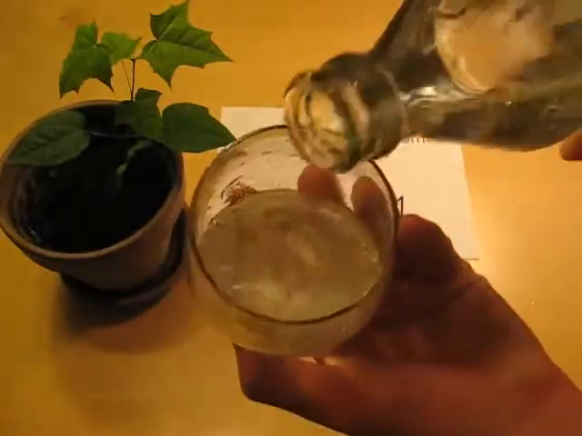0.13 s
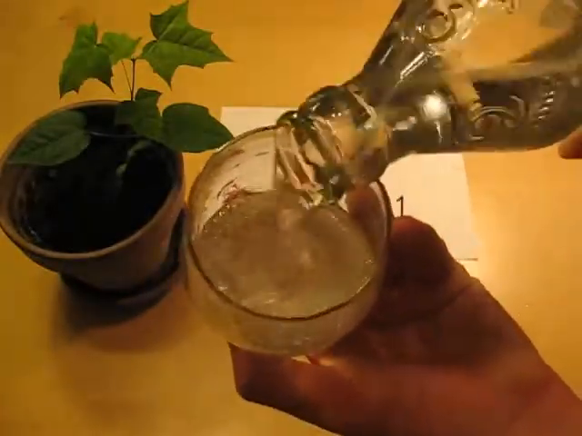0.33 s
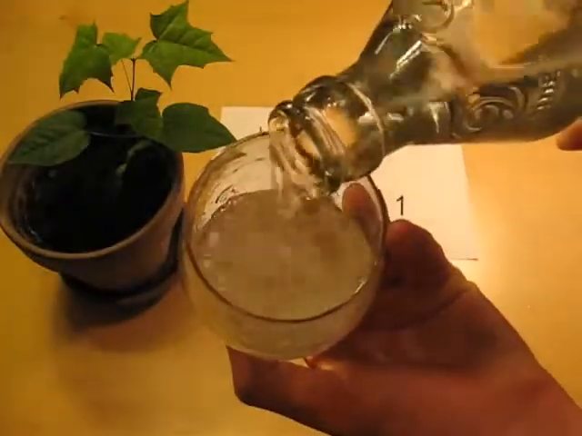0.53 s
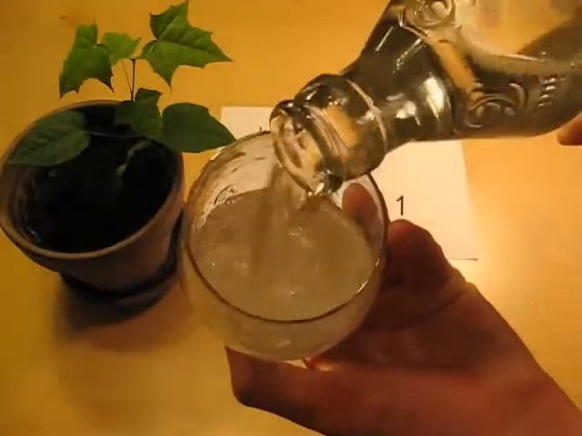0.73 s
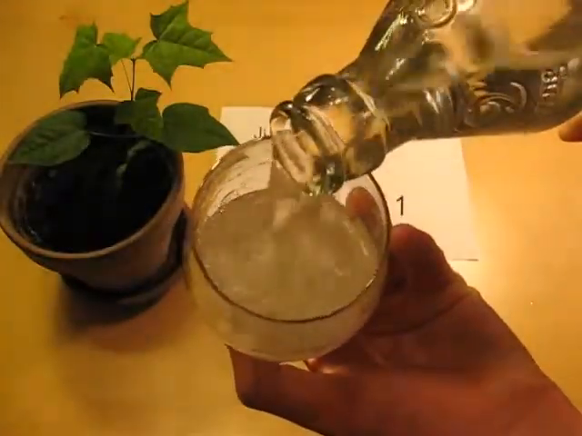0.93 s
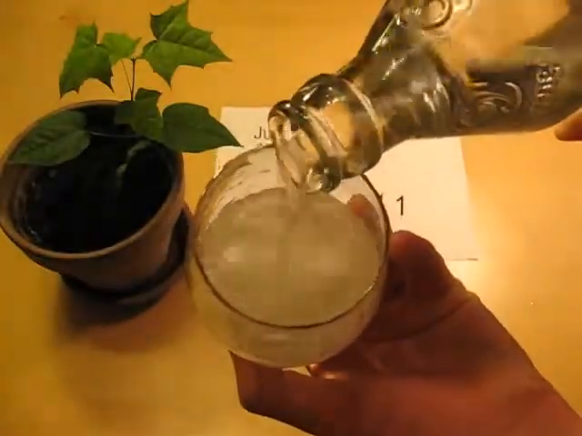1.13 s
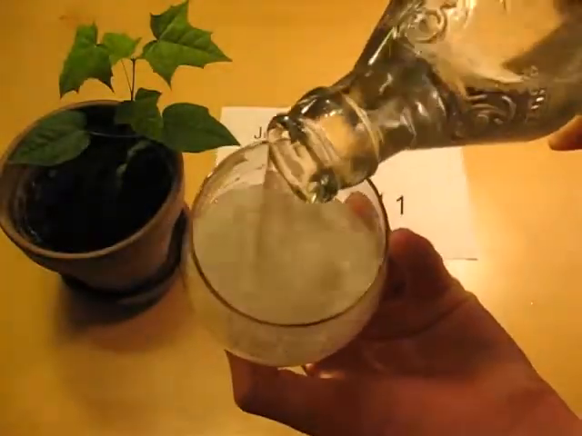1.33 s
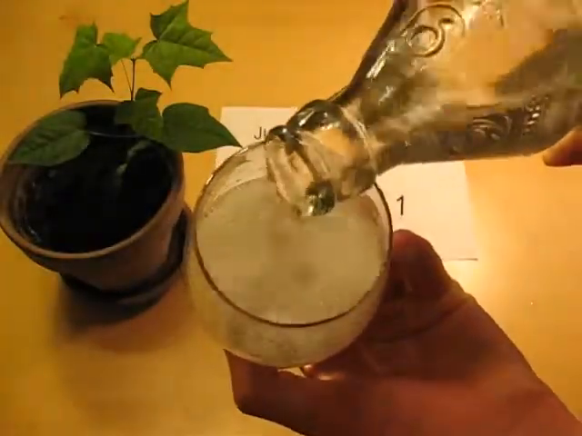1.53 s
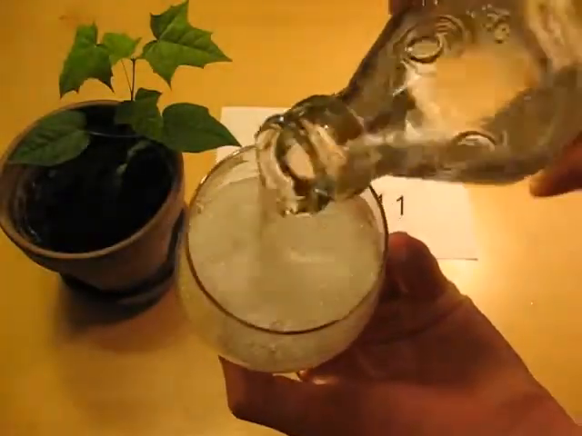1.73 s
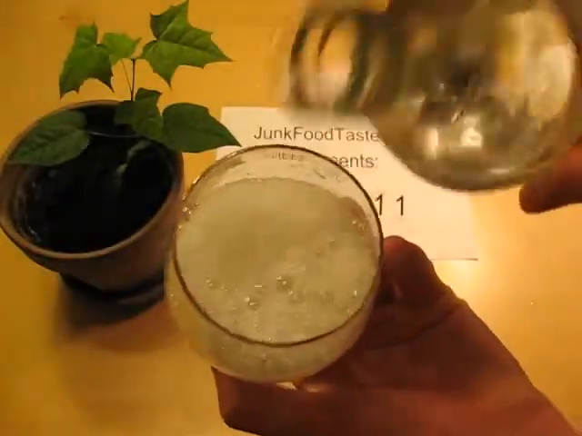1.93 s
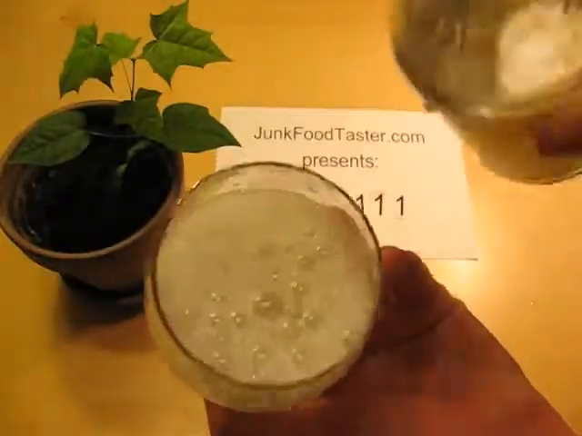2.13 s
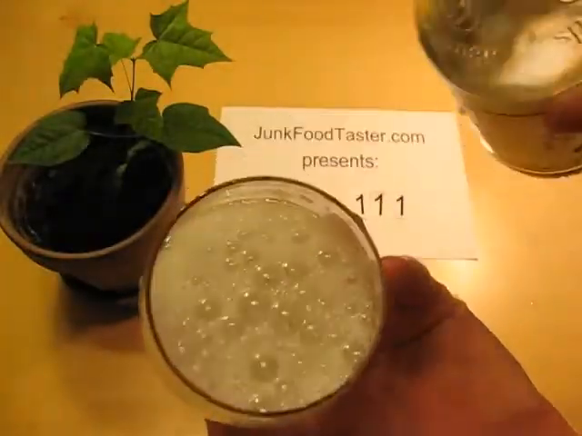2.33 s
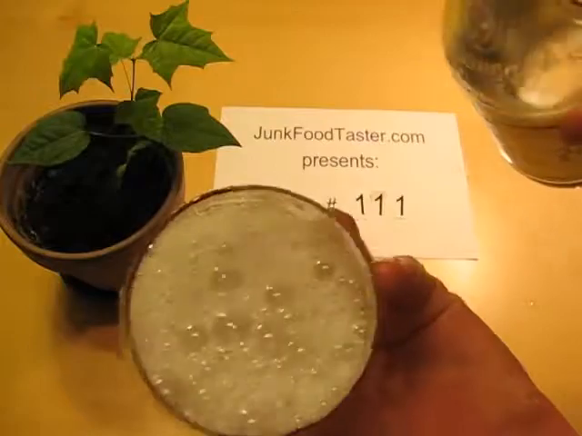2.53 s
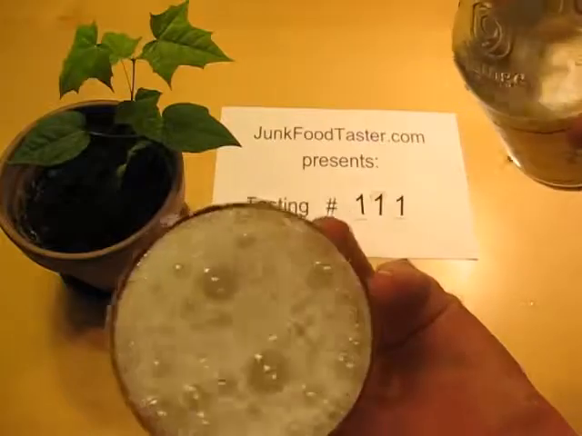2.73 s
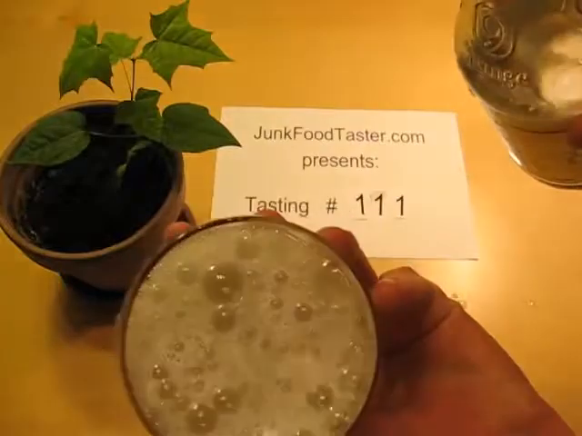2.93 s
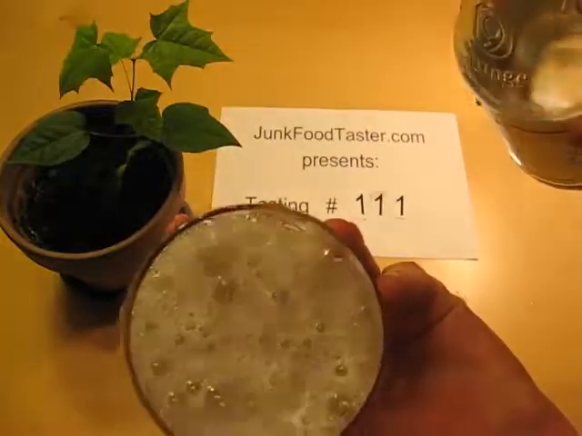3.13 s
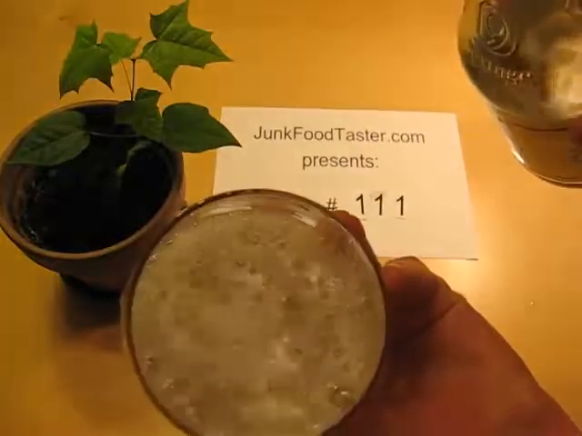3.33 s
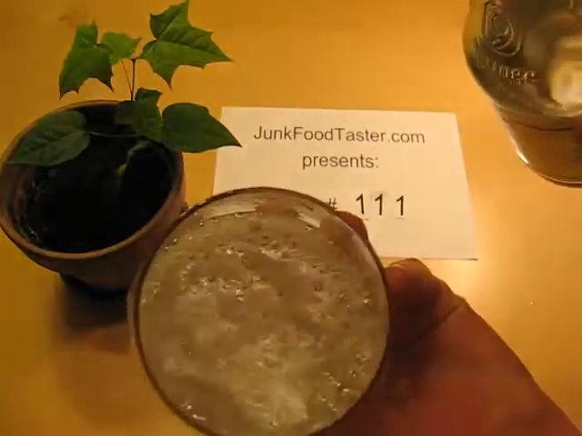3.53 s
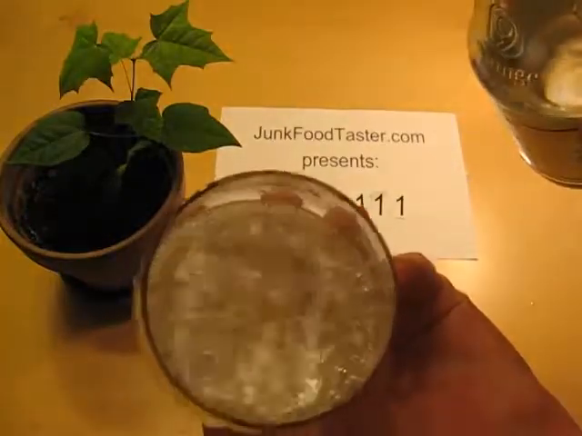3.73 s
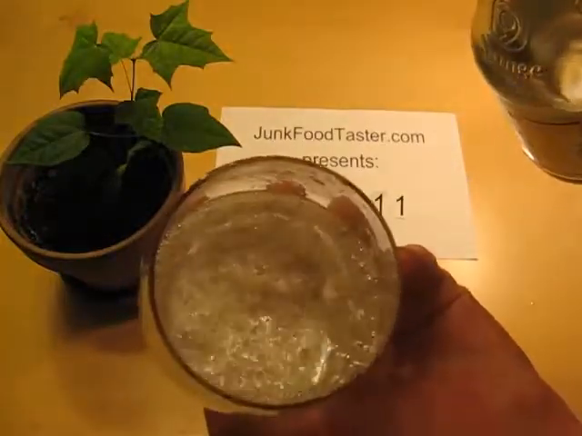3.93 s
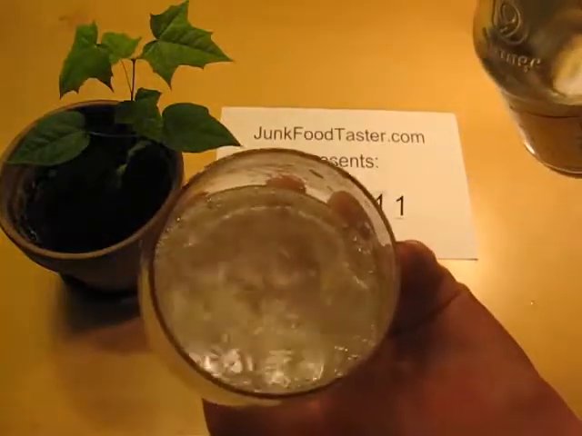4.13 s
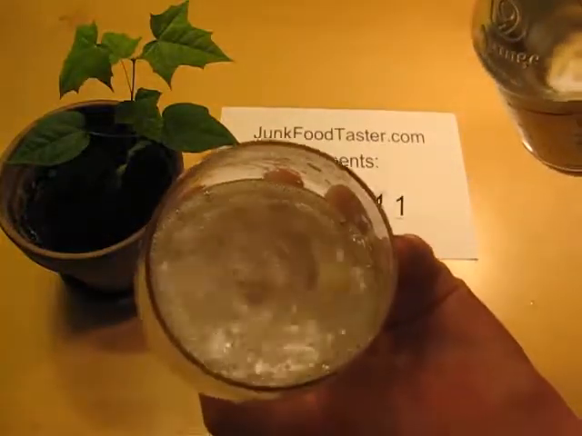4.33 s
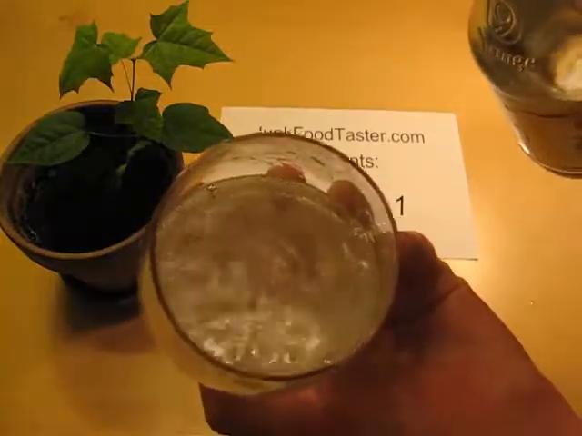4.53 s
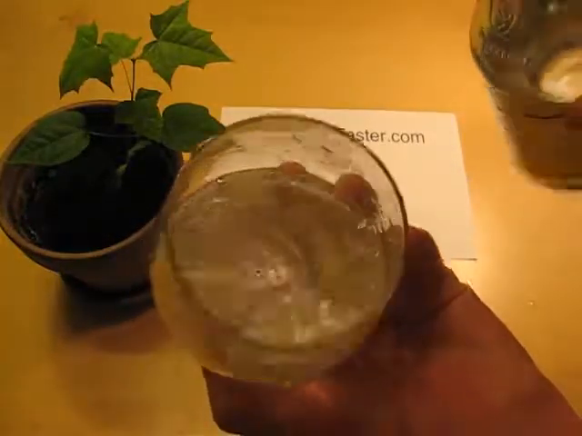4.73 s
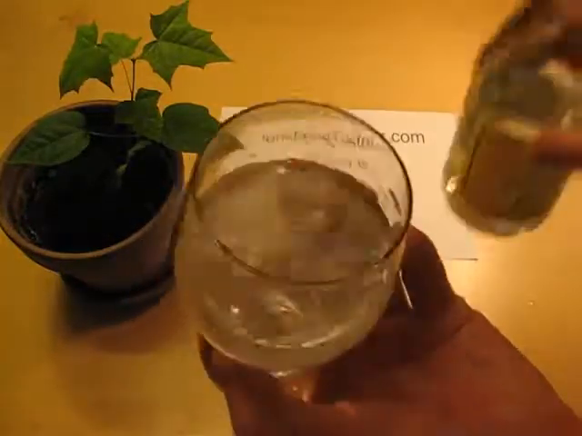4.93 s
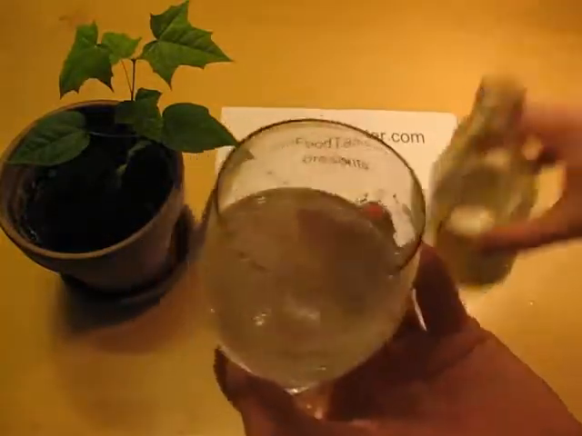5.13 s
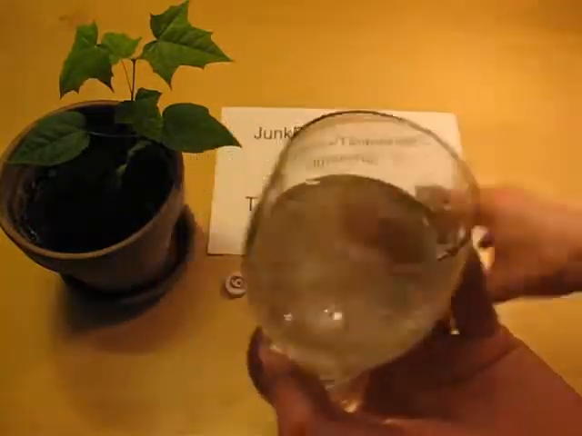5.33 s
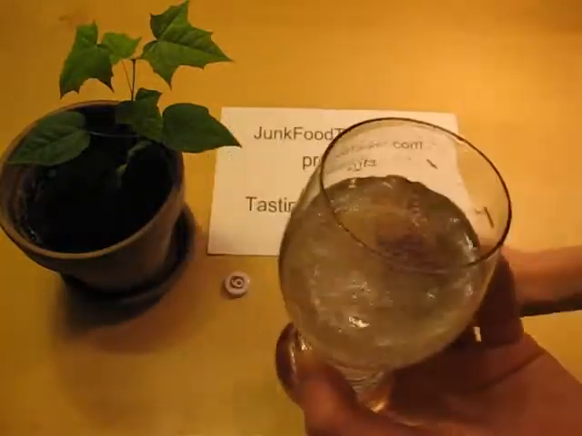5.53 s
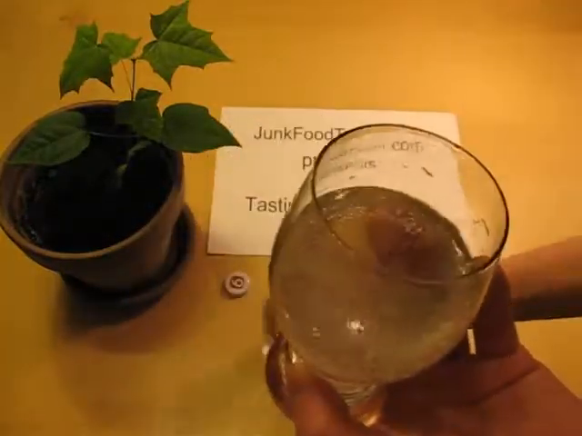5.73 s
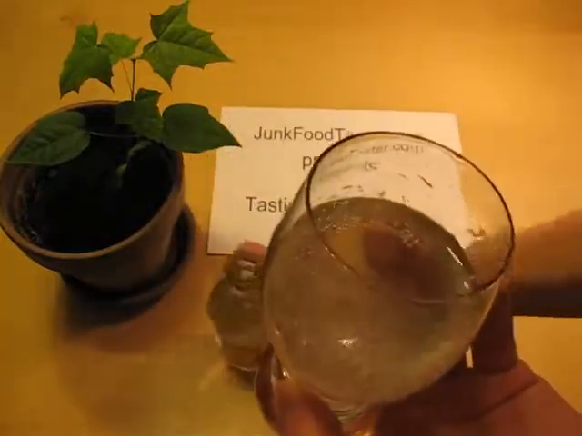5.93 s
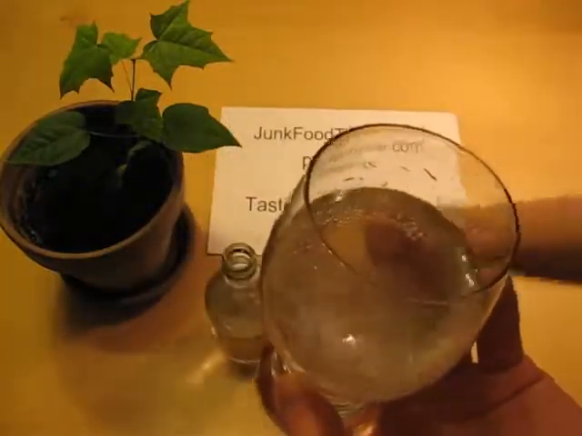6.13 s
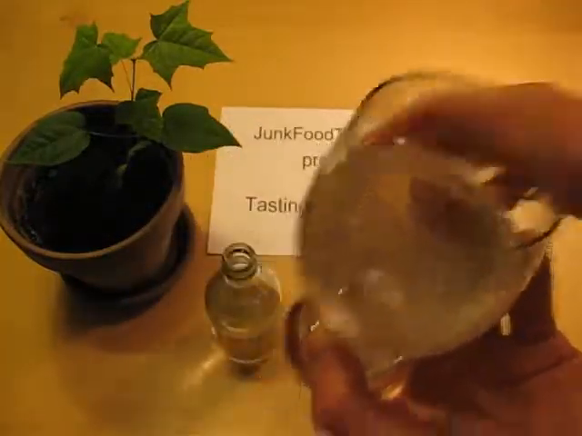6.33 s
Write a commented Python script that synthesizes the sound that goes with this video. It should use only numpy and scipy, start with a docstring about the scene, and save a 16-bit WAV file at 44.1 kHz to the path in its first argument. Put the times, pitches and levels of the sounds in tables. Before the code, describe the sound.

A close, crackling pour of fizzy drink with a glassy clink and plops, foam hissing and fading, ended by a loud wooden thump.

```python
"""Soda is poured from a glass bottle into a hand-held glass, close by in a small room.
A fizz of dense random pops and the bottle's gliding hum come first; struck modes clink as neck meets rim.
During the pour, films snap and ring as spits, gliding tones plop and gulp, and foam widens the fizz to a hiss.
The foam collapses, the drink fizzes on in the open glass, and a sleeve brushes past as soft noise.
Then a small bottle is knocked down on the table: a noise thud, ringing modes and a booming room."""
import sys
import numpy as np
from scipy import signal
from scipy.fft import rfft, irfft, next_fast_len
from scipy.io import wavfile
from scipy.ndimage import uniform_filter1d

SR = 44100
rng = np.random.default_rng(int(sys.argv[2]) if len(sys.argv) > 2 else 0)


def unload_wav(signal):
    """Save mono or channel-first audio to the path in sys.argv[1] as 16-bit WAV at rate SR, clipped to [-1, 1]."""
    wavfile.write(
        sys.argv[1],
        SR,
        np.round(np.clip(np.atleast_2d(signal).T, -1, 1) * 32767).astype(np.int16),
    )


N = 280917
TIME = np.arange(N) / SR
CLINK_S, KNOCK_S = .3058, 5.7824
POUR_START_S, POUR_END_S = 0.41, 1.6


def gain_of(db):
    """Decibels to amplitude."""
    return 10 ** (np.asarray(db) / 20)


def evened(x):
    """Scales to rms 1."""
    return x / np.sqrt(np.mean(x ** 2) + 1e-20)


def read(points, hz):
    """Reads a spectrum on a log-frequency axis."""
    f, value = np.transpose(points)
    return np.interp(np.log(hz + 1), np.log(f + 1), value)


def follow(rows, t):
    """Reads every column of a curve at times t."""
    s, *columns = np.transpose(rows)
    return [np.interp(t, s, c) for c in columns]


def add(mix, s, sound):
    """Mixes a sound in at time s."""
    part = mix[..., round(s * SR):][..., :sound.shape[-1]]
    part += sound[..., :part.shape[-1]]


def swell(t, db, half_s):
    """A smooth bell-shaped rise and fall around t = 0."""
    return gain_of(db) * np.exp(-(t / half_s) ** 2 / 2)


def low_cut(x, hz):
    """Cuts the bass with a steep high-pass."""
    return signal.sosfilt(signal.butter(3, hz, "high", fs=SR, output="sos"), x)


def coloured(x, colour):
    """Gives a signal a spectrum, at rms 1."""
    size = x.shape[-1]
    hz = np.fft.rfftfreq(2 * size, 1 / SR)
    return evened(irfft(rfft(x, 2 * size) * gain_of(read(colour, hz)))[..., :size])


def ring(modes, size=SR):
    """Struck modes, each a sine dying away exponentially."""
    t = np.arange(size) / SR
    return sum(gain_of(db) * 1e-3 ** (t / max(t60, .002)) * np.sin(2 * np.pi * hz * t)
               for hz, db, t60 in modes)


def paired(two, likeness):
    """Short-time spectra of two unrelated signals, made alike as at two close ports."""
    hz, t, z = signal.stft(two, SR, nperseg=512)
    same = np.clip(read(likeness, hz), 0, 1)[:, None]
    right = same * z[0] + np.sqrt(1 - same ** 2) * z[1]
    return hz[:, None], t, np.array([z[0], right])


def sound_of(z):
    """Short-time spectra back to sound."""
    return signal.istft(z, SR)[1][:, :N]


# likeness of diffuse sound at the two ports: (frequency [Hz], likeness [0-1])
DIFFUSE_LIKENESS = [(100, 0.92), (300, 0.78), (550, 0.85), (1000, 0.81), (2000, 0.54), (4000, 0.18),
                    (15000, 1)]


def diffuse(size):
    """Noise arriving from all sides, as short-time spectra."""
    return paired(rng.standard_normal((2, size)), DIFFUSE_LIKENESS)


def murk(db, colour):
    """Soft diffuse noise of a given level and colour."""
    return gain_of(db) * coloured(sound_of(diffuse(N)[2]), colour)


# the head of foam grows during the pour, slowly at first, stands, then collapses
FOAM_FULL_S, FOAM_BREAKS_S, FOAM_GONE_S = 1.83, 2.53, 4.27
FOAM_CURVE = 1.5


def foam_share(t):
    """Share of the surface under foam, 0-1."""
    growth = (t / FOAM_FULL_S) ** FOAM_CURVE
    collapse = (FOAM_GONE_S - t) / (FOAM_GONE_S - FOAM_BREAKS_S)
    return np.clip(np.minimum(growth, collapse), 0, 1)


# fizz heard through the foam head: (frequency [Hz], relative density [dB per Hz])
FOAM_SPECTRUM = [(300, -27), (700, -13.5), (1000, -5), (1220, 2.5), (1550, -1.5), (2200, -7), (3000, -3.5),
                 (4500, -1), (7100, 1.5), (8200, -2), (10000, -12.5), (11800, -11), (15500, -25)]
# bands that swell in the foam, a hollow murmur and then a hiss sweeping upward: (time of the middle [s],
# half length [s], lift [dB], centre [Hz], glide [octaves per s], half width [octaves])
FOAM_BANDS = [(2.6, .28, 2.8, 1120, .1, .2), (3.05, .35, 2.2, 4500, 1.2, .3)]
# as the head drains it loses its low murmur
DRAIN_S, DRAIN_DB_PER_S, DRAIN_BELOW_HZ = 2.44, 8, 1100


def foam_colour(hz, t):
    """Spectrum of the foam in dB, as it drains and collapses."""
    lowness = np.clip(2 * np.log2(DRAIN_BELOW_HZ / (hz + 1)), 0, 1)
    drain = DRAIN_DB_PER_S * np.clip(t - DRAIN_S, -.5, 1) * lowness
    bands = 0
    for s, half_s, db, centre, glide, width in FOAM_BANDS:
        octaves_off = np.log2((hz + 1) / centre) - glide * (t - s)
        bands = bands + db * swell(t - s, 0, half_s) * swell(octaves_off, 0, width)
    return read(FOAM_SPECTRUM, hz) - drain + bands


# fizz level before trim: (time [s], level below the split [dB], level above the split [dB])
FIZZ_LEVELS = [(0, -47, -42.5), (.3, -49.5, -45.5), (.85, -47, -45.5), (1.3, -39, -41.7),
               (2.3, -35.5, -38.5), (2.85, -35, -40.5), (3.28, -35.5, -38.5), (3.7, -40, -40.4),
               (4.22, -46, -45.5), (4.62, -46.5, -46), (5.1, -54.5, -49.5), (5.75, -55, -48.5),
               (6.37, -54.5, -51)]
# fizz of the bare surface between the resonances: (frequency [Hz], relative density [dB per Hz])
BARE_SPECTRUM = [(300, -19.5), (1000, -57), (2300, -19.5), (3500, -18), (5000, -9.5), (6500, -7),
                 (8200, -5.5), (10200, -13), (12000, -11), (15500, -27.5)]
# resonances of the air above the drink: (frequency [Hz], width [Hz], relative level [dB])
AIR_RESONANCES = [(1242, 64, -4), (1850, 190, -23), (2912, 152, -1.5), (4440, 580, -6), (5570, 140, -1.5),
                  (7400, 610, 2), (8100, 220, -3.5)]
# likeness of the fizz at the two ports: (frequency [Hz], left-right likeness [0-1])
FIZZ_LIKENESS = [(100, 0.42), (1400, 1), (3100, 0.98), (6800, 0.72), (11000, 0.29), (15000, .2)]
# bursts so many that they almost merge
POPS_PER_S = 11000


def fizz(spread_db=3.0, wash=0.36, coarse_db=-1.0, fine_db=0.5, split_hz=6300, clump_db=1.37):
    """Countless tiny bursts ring the air in the glass; foam damps that ring to a broad hiss."""
    sizes_db = spread_db * np.minimum(rng.exponential(1, (2, N)), 5)
    sizes = gain_of(sizes_db) * rng.choice([-1, 1], (2, N))
    pops = evened(sizes * (rng.random((2, N)) < POPS_PER_S / SR))
    hz, t, z = paired(pops + wash * rng.standard_normal((2, N)), FIZZ_LIKENESS)

    # the bare, resonant colour gives way to the foam's colour and returns
    foam = foam_share(t)
    column = sum(gain_of(db) ** 2 / (1 + (2 * (hz - f) / width) ** 2) ** 1.67
                 for f, width, db in AIR_RESONANCES)
    bare = np.sqrt(column + gain_of(read(BARE_SPECTRUM, hz)) ** 2)
    colour = bare ** (1 - foam) * gain_of(foam_colour(hz, t)) ** foam

    # coarse and fine fizz follow separate levels
    fine = 1 / (1 + (split_hz / (hz + 1)) ** 12)
    field = 0
    for share, level, trim in zip((1 - fine, fine), follow(FIZZ_LEVELS, t), (coarse_db, fine_db)):
        part = colour * share
        field = field + gain_of(level + trim) * part / np.sqrt(np.mean(part ** 2, axis=0))

    # bubbles of like size surface in clumps, most clearly where the foam is gone
    across_pitch = uniform_filter1d(rng.standard_normal(field.shape), size=14, axis=0)
    clumps = evened(uniform_filter1d(across_pitch, size=3, axis=1))
    return sound_of(z * field * gain_of(clump_db * (1 - foam / 2) * clumps))


def glug(s, db, hz, octaves_per_s, half_s, flutter=.35):
    """A pocket of air sounds one soft, fluttering glide: start time and sound."""
    t = np.arange(-3 * half_s, 3 * half_s, 1 / SR)
    wobble = 1 + flutter * evened(uniform_filter1d(rng.standard_normal(SR), size=400))[:len(t)]
    phase = 2 * np.pi * np.cumsum(hz * 2 ** (octaves_per_s * t)) / SR
    return s + t[0], swell(t, db, half_s) * wobble * np.sin(phase)


# air ringing in the bottle: its pitch settles upward, and it fades, losing a step once drink fills the neck
HUM_START_HZ, HUM_END_HZ, HUM_SETTLE_S = 248, 262, .8
HUM_DB, HUM_FADE_DB_PER_S, HUM_OPEN_DB = -59, 3.5, 2
# air gulped through the neck, each gulp a short upward glide: (time of the middle [s], level [dB])
NECK_GULPS = [(.546, -45), (.888, -47.5), (1.192, -47.5), (1.501, -44.5)]
GULP_HZ, GULP_OCTAVES_PER_S, GULP_HALF_S = 113, 34.4, 0.016
# swallowed air then wobbling in the bottle: (time of the middle [s], level [dB], pitch [Hz])
BOTTLE_BLUBS = [(.99, -54, 156), (1.278, -46, 205), (1.571, -40, 238)]
BLUB_OCTAVES_PER_S, BLUB_HALF_S = -2.7, 0.017


def bottle(waver=0.05, waver_hz=7):
    """The bottle's hollow hums, and air slips in through the neck in short gliding gulps."""
    hz = HUM_END_HZ + (HUM_START_HZ - HUM_END_HZ) * np.exp(-TIME / HUM_SETTLE_S)
    neck_db = np.interp(TIME, [CLINK_S, POUR_START_S], [HUM_OPEN_DB, 0])
    level = np.sqrt(2) * gain_of(HUM_DB - HUM_FADE_DB_PER_S * TIME + neck_db)
    # slow noise wavers both strength and phase of the hum
    slow = signal.butter(2, waver_hz, fs=SR, output="sos")
    drift = evened(signal.sosfilt(slow, rng.standard_normal((2, N))))
    wavering = 1 + waver * (drift[0] + 1j * drift[1])
    out = level * (wavering * np.exp(2j * np.pi * np.cumsum(hz) / SR)).real
    for s, db in NECK_GULPS:
        add(out, *glug(s, db, GULP_HZ, GULP_OCTAVES_PER_S, GULP_HALF_S))
    for s, db, pitch in BOTTLE_BLUBS:
        add(out, *glug(s, db, pitch, BLUB_OCTAVES_PER_S, BLUB_HALF_S))
    return out


# colour of a snap: (frequency [Hz], relative density [dB per Hz])
SNAP_SPECTRUM = [(300, -18), (700, -5), (1200, -2), (2100, -8), (3000, -2), (5000, -1), (7500, 1),
                 (8600, -8), (10000, -18), (15500, -32)]


def snap(decay_s):
    """The brief noise crack of a tearing film or a hard contact."""
    t = TIME[:2048]
    return coloured(rng.standard_normal(len(t)), SNAP_SPECTRUM) * np.exp(-t / decay_s)


# glass modes as neck meets rim: (frequency [Hz], level [dB], decay by 60 dB [s])
CLINK_MODES = [(645, -15, 0.051), (627, -43, 0.2), (1010, -14.5, 0.025), (1398, -21.5, 0.08),
               (1404, -33, 0.62), (2640, -36, 0.22), (7526, -19.5, 0.13), (7545, -32, 0.63),
               (8000, -36, 0.08), (9695, -42, 0.11)]


def clink(tick_db=-15, tick_s=0.0052):
    """The neck touches the rim with a tick and the glass rings."""
    out = np.zeros(N)
    add(out, CLINK_S, ring(CLINK_MODES))
    add(out, CLINK_S, gain_of(tick_db) * snap(tick_s))
    return out


# the longest partial of the clink dies slowly, and swells once as the bottle turns
RING_HZ, RING_DB, RING_T60 = 4839, -30, 1.05
SWELL_S, SWELL_DB, SWELL_HALF_S = 0.364, -22.5, 0.026


def singing_rim():
    """The longest partial of the clink sings on, swelling and fading."""
    t = np.maximum(TIME - CLINK_S, 0)
    level = gain_of(RING_DB - 60 * t / RING_T60) + swell(TIME - SWELL_S, SWELL_DB, SWELL_HALF_S)
    return level * np.sin(2 * np.pi * RING_HZ * t)


def burst(hz, t60, snap_db, rise_s=0.0014, snap_s=0.0024, tear_s=0.0028, tear_db=-5, glide=2):
    """A film tears with a snap, and the bubble rings briefly, its pitch rising as it surfaces."""
    t = TIME[:2048]
    tone = 1e-3 ** (t / max(t60, .004)) * np.sin(2 * np.pi * hz * (t + glide * t ** 2 / 2))
    # noise gathered around the bubble's pitch
    tear_colour = [(hz / 3, -30), (hz / 1.17, -12), (hz, 0), (hz * 1.35, -15), (hz * 2, -35)]
    tear = coloured(rng.standard_normal(len(t)), tear_colour) * np.exp(-t / tear_s)
    attack = 1 - np.exp(-(t / rise_s) ** 2)
    return (tone + gain_of(tear_db) * tear + gain_of(snap_db) * snap(snap_s)) * attack


# level difference of the two microphone ports: (frequency [Hz], left minus right [dB])
PORT_BALANCE = [(100, -1), (2400, 0), (4400, -4), (8100, -3), (11000, 7.5), (15000, 13.5)]
# the loudest small bubbles: (time [s], level [dB], pitch [Hz], broad snap relative to the ring [dB])
LOUD_SPITS = [(0.4312, -11, 5140, -2), (0.442, -12, 5180, -17), (0.488, -14, 6980, -13),
              (0.5305, -26, 7400, 2), (0.5467, -13.5, 7500, -1.5), (0.564, -12, 7520, -19),
              (0.5731, -20, 2970, 1), (0.5822, -22.5, 2950, -5), (.6085, -22, 5700, -5),
              (0.647, -18.5, 5680, -13), (0.6861, -25, 3410, -0.5), (.727, -29.5, 5000, 1),
              (0.8714, -13, 7550, -6), (.8992, -11, 7000, -23), (.965, -30, 2890, -3),
              (1.02, -10.5, 7300, -2), (1.0317, -16, 7170, -10), (1.07, -16, 6230, -0.5),
              (1.0822, -19, 3150, -8), (1.1847, -18.5, 6970, -7), (1.268, -27, 5930, 5.5),
              (1.3126, -22, 7450, 5.5), (1.482, -20.5, 7500, 0.5), (1.6375, -18.5, 5940, 2),
              (5.2789, -25, 7600, -8), (5.422, -26, 7640, -12)]
# ring time at this pitch; larger, lower bubbles ring longer
SPIT_T60, SPIT_T60_HZ, SPIT_SIZE_LAW = 0.023, 5950, .55
SPIT_PAN_DB = -3.5  # left minus right, as heard after the ports


def spits(level_db=0.0):
    """The loudest small bubbles burst, a little to the right."""
    out = np.zeros((2, N))
    for s, db, hz, snap_db in LOUD_SPITS:
        # cancels the port balance at the pitch, so that only the pan remains
        lean = (SPIT_PAN_DB - read(PORT_BALANCE, hz)) * np.array([[.5], [-.5]])
        t60 = SPIT_T60 * (SPIT_T60_HZ / hz) ** SPIT_SIZE_LAW
        add(out, s, gain_of(db + level_db + lean) * burst(hz, t60, snap_db))
    return out


# hollow body under a plop: (frequency [Hz], relative level [dB], decay by 60 dB [s])
HOLLOW_MODES = [(304, -4, 0.056), (641, -5, 0.036), (864, 2, 0.0099)]
PLOP_T60, LINGER_T60 = .03, .12


def plop(hz, body_db, linger_db=-20, hollow_db=-1, snap_db=-14, snap_s=0.0034, sag=.06, sag_s=.003):
    """A large bubble opens and sounds the air above the drink, starting a little sharp."""
    t = TIME[:12000]
    fade = 1e-3 ** (t / PLOP_T60) + gain_of(linger_db) * 1e-3 ** (t / LINGER_T60)
    pitch = hz * (1 + sag * np.exp(-t / sag_s))
    tone = fade * np.sin(2 * np.pi * np.cumsum(pitch) / SR)
    out = tone + gain_of(body_db + hollow_db) * ring(HOLLOW_MODES, size=len(t))
    add(out, 0, gain_of(snap_db) * snap(snap_s))
    return out


# large bubbles breaking, levels before trim: (time [s], level [dB], pitch [Hz], hollow body [dB])
LOUD_PLOPS = [(0.4329, -30, 984, -24), (0.4714, -20.5, 990, -22), (.658, -22.5, 880, -20),
              (0.8738, -29.5, 1097, -5.5), (1.0219, -17, 1100, -7.5), (1.186, -32.5, 1100, -10),
              (1.2693, -32, 1215, -8), (1.3179, -21.5, 1050, 3), (1.35, -26, 1130, -16),
              (1.504, -28, 1200, -13), (1.522, -30, 1220, -14), (1.638, -26.5, 1253, 3.5),
              (1.6994, -23.5, 1190, -8.5)]
# lesser plops fall at random during the pour, their pitch rising as the glass fills
SMALL_PLOP_DB, SMALL_PLOP_BODY_DB, EMPTY_HZ, FULL_HZ = -34.5, -6, 920, 1280


def plops(level_db=2, count=10):
    """The loud plops, and lesser ones spread over the pour."""
    out = np.zeros(N)
    for s, db, hz, body_db in LOUD_PLOPS:
        add(out, s, gain_of(db + level_db) * plop(hz, body_db))
    for filled in (np.arange(count) + rng.random(count)) / count:
        s = POUR_START_S + filled * (POUR_END_S - POUR_START_S)
        hz = EMPTY_HZ + filled * (FULL_HZ - EMPTY_HZ)
        add(out, s, gain_of(SMALL_PLOP_DB) * plop(hz, SMALL_PLOP_BODY_DB))
    return out


def scatter(start, end, count, level_db, low_hz, high_hz, snap_db):
    """Stray bubbles burst at random size, pitch, time and place."""
    out = np.zeros((2, N))
    for when, pitch, size, place in rng.random((count, 4)):
        tick = burst(low_hz * (high_hz / low_hz) ** pitch, .018, snap_db)
        pan_db = (place - .5) * np.array([[6], [-6]])
        loudness = gain_of(level_db - 10.5 * np.sqrt(size) + pan_db)
        add(out, start + when * (end - start), loudness * tick)
    return out


def in_glass(x, column_db=-4.5):
    """Each burst also rings the air standing above the drink, here its three lowest resonances."""
    t = TIME[:2048]
    column = 0
    for hz, width, db in AIR_RESONANCES[:3]:
        decay = 2 * np.pi * width / SR * np.exp(-np.pi * width * t)
        column = column + gain_of(db) * decay * np.cos(2 * np.pi * hz * t)
    return x + gain_of(column_db) * signal.oaconvolve(x, column[None], axes=1)[:, :N]


# decay of the room: (frequency [Hz], decay by 60 dB [s])
ROOM_DECAY = [(100, 1), (300, 0.8), (700, 0.58), (2500, 0.7), (6000, 0.42), (14000, 0.43)]


def room_tail():
    """Diffuse reflections that build up, then die at a rate set by frequency."""
    hz, t, z = diffuse(SR)
    tail = sound_of(z * gain_of(-60 * t / read(ROOM_DECAY, hz)))[:, :SR]
    tail *= np.clip((TIME[:SR] - .004) / 0.0049, 0, 1)
    return tail / np.linalg.norm(tail[0])


# hand and sleeve brushing past: (time of the middle [s], level [dB], half length [s])
SLEEVE_BRUSHES = [(4.4, -56, .07), (4.743, -55, 0.17), (5.75, -52, 0.33), (6.37, -55.5, 0.19)]
# colour of the brushing: (frequency [Hz], relative density [dB per Hz])
BRUSH_SPECTRUM = [(30, -45), (150, -11), (400, -3), (800, -21), (1200, 1.5), (1500, -5.5), (1800, -1.5),
                  (2400, -12.5), (4000, -8), (9000, -46)]


def rustle():
    """Each move of the arm is a soft swell of brushing noise."""
    level = sum(swell(TIME - s, db, half_s) for s, db, half_s in SLEEVE_BRUSHES)
    return level * murk(0, BRUSH_SPECTRUM)


# modes of the table top: (frequency [Hz], level [dB], decay by 60 dB [s])
TABLE_MODES = [(117, -47, 2.4), (128, -33, 1.0), (193, -24, .55), (264, -22, .6), (301, -38, 2.8),
               (340, 1.5, .075), (354, -34.5, 2.2), (404, -44, 1.8), (457, -24, .6), (497, -23.5, .7),
               (564, -25, .4), (625, -26, .5), (708, -14, .27), (763, -25, .5), (938, -18, .25),
               (1631, -24, .12), (2643, -30, .14)]
# colour of the thud: (frequency [Hz], relative density [dB per Hz])
THUD_SPECTRUM = [(18, -52), (30, -20), (87, -39), (240, -4), (404, -6.5), (581, -3), (978, -2.5),
                 (1200, -15.5), (2560, -15), (3500, -20), (3980, -21), (5300, -23), (15000, -52)]
# colour of the room after the blow: (frequency [Hz], relative density [dB per Hz])
BOOM_SPECTRUM = [(29, -77), (50, -35), (119, -30), (153, -10), (180, -8), (231, -18), (256, -5.5),
                 (438, -0.5), (598, -9.5), (705, -4.5), (815, -9), (1680, -16.5), (7000, -35), (9100, -74),
                 (15400, -120)]


def knock(thud_db=-3.5, thud_s=0.0071, boom_db=-26.5, low_hz=115, shake_db=-40, shake_s=.004):
    """A hard blow on the table top: a thud, the table's modes, and the room booming after."""
    out, t = np.zeros((2, N)), TIME[:SR]
    noise = coloured(sound_of(diffuse(SR)[2])[:, :SR], THUD_SPECTRUM)
    thud = gain_of(thud_db) * noise * np.exp(-t / thud_s)
    # the thud and the table's modes keep little bass, but one low push shakes the microphones directly
    shake = gain_of(shake_db) * (1 - t / shake_s) * np.exp(-t / shake_s)
    boom = gain_of(boom_db) * coloured(room_tail(), BOOM_SPECTRUM)
    add(out, KNOCK_S, low_cut(thud + ring(TABLE_MODES), low_hz) + shake + boom)
    return out


# phase difference of the two ports: (frequency [Hz], left minus right [radians])
PORT_PHASES = [(100, -0.07), (3200, 0.015), (5400, 1.07), (7150, 0.28), (9400, 1.3), (11000, 1.2),
               (15000, -0.14)]


def ports(x):
    """The two microphone ports hear sound with different strength and phase, mostly in the treble."""
    size = 2 * next_fast_len(N)
    hz = np.fft.rfftfreq(size, 1 / SR)
    side = np.array([[.5], [-.5]])
    strength = gain_of(side * read(PORT_BALANCE, hz))
    turn = np.exp(1j * side * read(PORT_PHASES, hz))
    return irfft(rfft(x, size) * strength * turn)[:, :N]


# colour of the quiet room: (frequency [Hz], relative density [dB per Hz])
FLOOR_SPECTRUM = [(25, -23), (60, -7), (130, -1), (320, 3), (600, 3), (1200, 2), (2500, -10), (6000, -29),
                  (15000, -17)]


def scene(room_db=-11, floor_db=-56.0):
    """The pour with its reflections, the fizz, the knock and the quiet room."""
    first_splash = scatter(start=.49, end=0.7, count=44, level_db=-26.5,
                           low_hz=1700, high_hz=7680, snap_db=-7)
    stream = scatter(start=0.89, end=1.95, count=55, level_db=-25.5,
                     low_hz=2606, high_hz=7780, snap_db=-6)
    dying_foam = scatter(start=3.5, end=5.1, count=34, level_db=-32.5,
                         low_hz=3510, high_hz=6500, snap_db=-13)
    last_bubbles = scatter(start=3.6, end=5.7, count=85, level_db=-32.0,
                           low_hz=7185, high_hz=8100, snap_db=-14)
    bursts = in_glass(spits() + first_splash + stream + dying_foam + last_bubbles)
    glass = low_cut(bursts + plops() + clink(), 407)
    echo = gain_of(room_db) * signal.fftconvolve(glass.mean(0)[None], room_tail(), axes=1)[:, :N]
    quiet_room = murk(floor_db, FLOOR_SPECTRUM)
    return ports(glass + singing_rim() + echo + bottle() + fizz() + rustle() + knock() + quiet_room)


EDGE_HZ = 15750  # top of the band


def record(dry):
    """Peaks near full scale are rounded off, as when the knock overloads; then the band limit."""
    clipped = dry / (1 + dry ** 16) ** (1 / 16)
    band = signal.firwin(511, EDGE_HZ, window=("kaiser", 9), fs=SR)
    return signal.oaconvolve(clipped, band[None], "same")


dry = scene()
out = record(dry)
unload_wav(out)
```